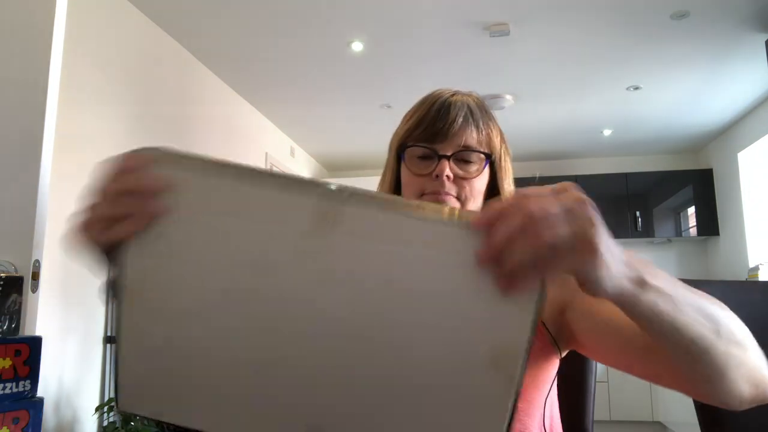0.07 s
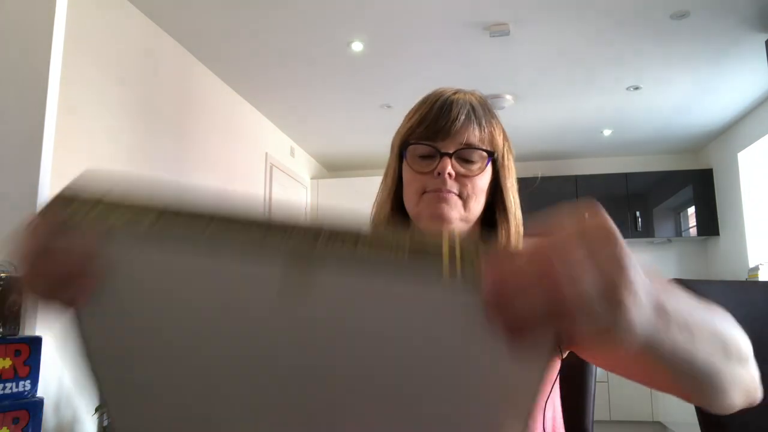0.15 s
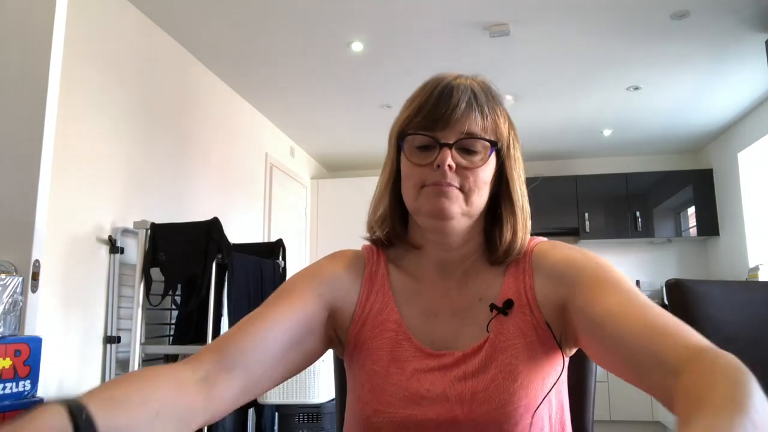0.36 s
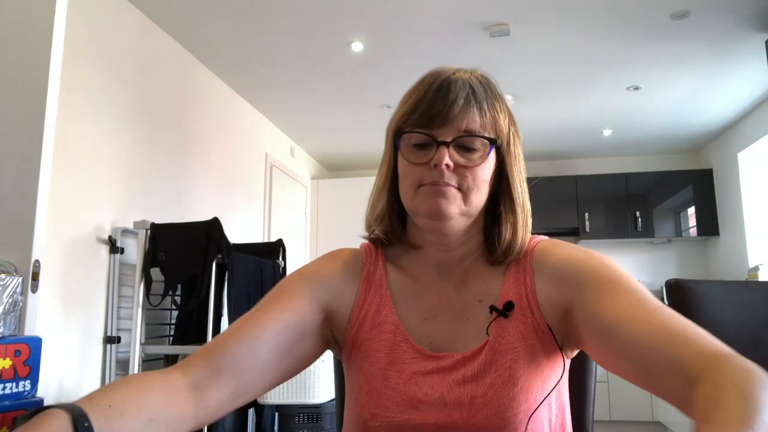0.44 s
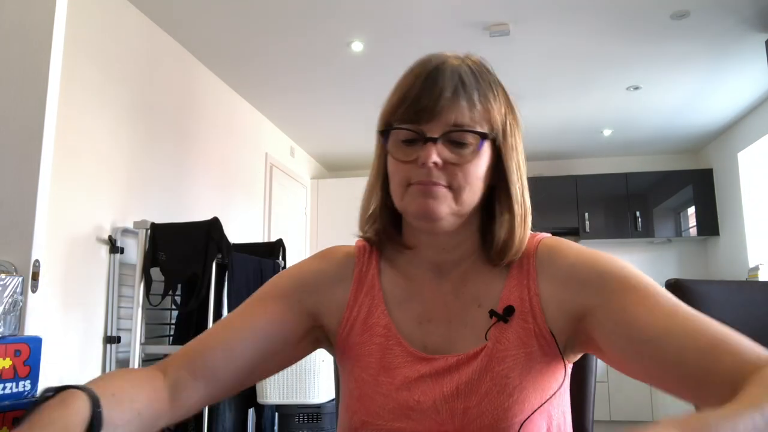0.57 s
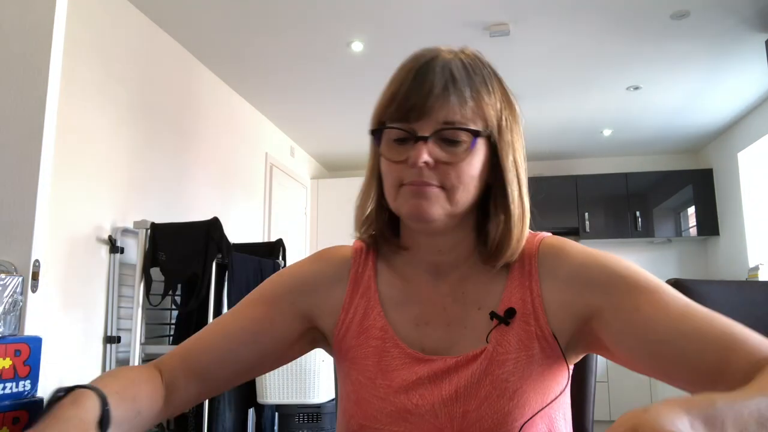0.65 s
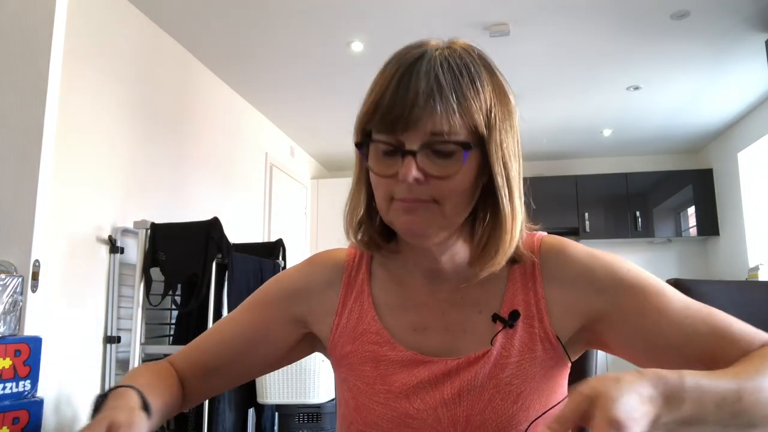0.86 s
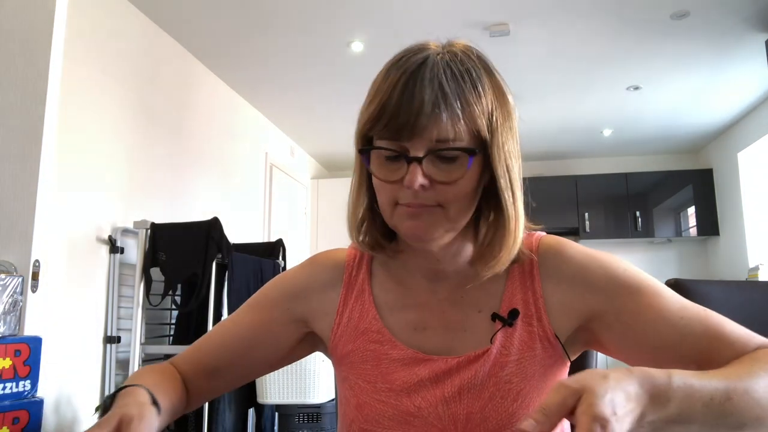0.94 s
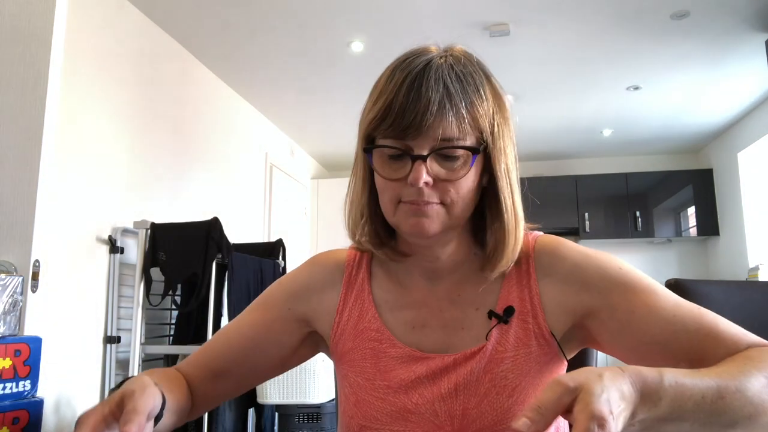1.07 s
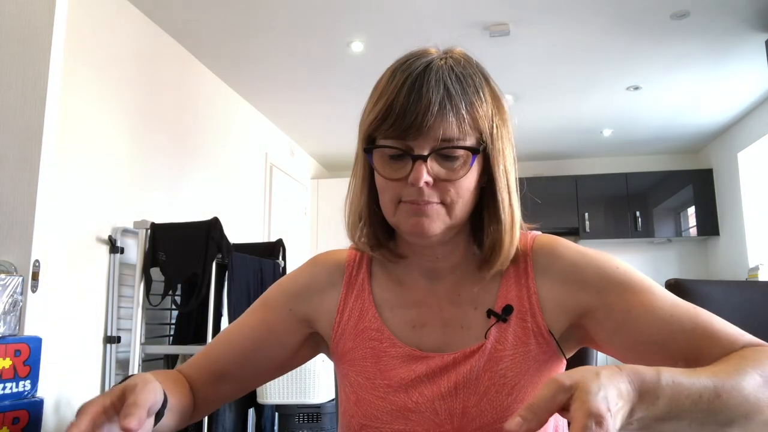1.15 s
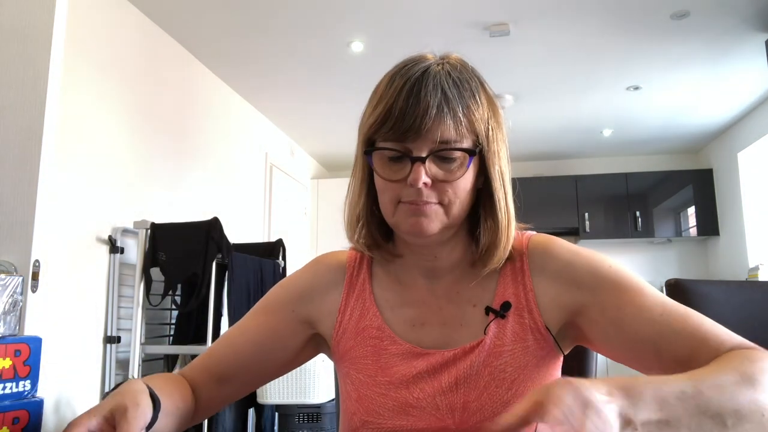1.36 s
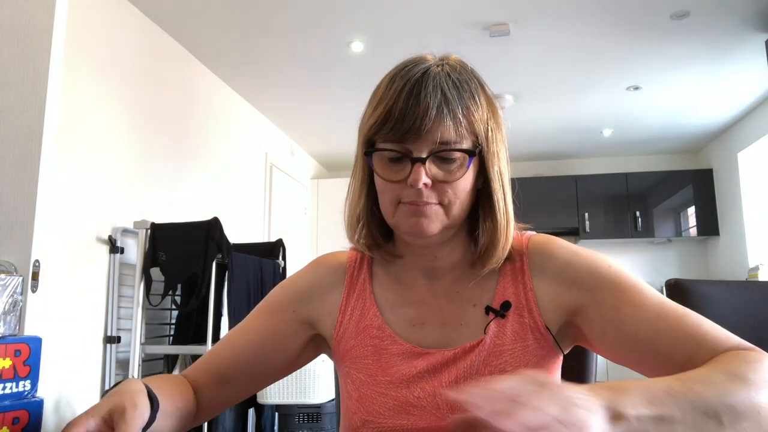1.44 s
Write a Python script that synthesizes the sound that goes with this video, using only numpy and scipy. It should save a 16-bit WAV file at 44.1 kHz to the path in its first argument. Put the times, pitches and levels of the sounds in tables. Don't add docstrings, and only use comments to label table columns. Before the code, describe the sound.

A cardboard box is handled at a table in a bare, reverberant room with faint hum. Fingers rub and the base scuffs and taps until a loud, hollow, cracking slam at 0.22 s overloads the small close microphone. It rocks and scrapes, with softer knocks around 0.36 s and a second clatter at 0.55 s. From 0.9 s come light bumps, paper ticks, rubbing, and a tiny squeak near 1.33 s.

```python
import sys
import numpy as np
from scipy import signal
from scipy.fft import rfft, irfft
from scipy.io import wavfile
from scipy.ndimage import uniform_filter1d, map_coordinates

SR = 44100
rng = np.random.default_rng(int(sys.argv[2]) if len(sys.argv) > 2 else 0)


def generate_wav(sig):
    pcm = np.round(np.clip(np.atleast_2d(sig).T, -1, 1) * 32767).astype(np.int16)
    wavfile.write(sys.argv[1], SR, pcm)


def elevation(decibels):
    levels = np.asarray(decibels, float)
    return 10 ** (levels / 20)


N = 66150


def unit(x):
    return x / np.sqrt(np.mean(x ** 2))


def table(hz, rows):
    rows = np.array(rows, float)
    return np.interp(np.log(np.maximum(hz, 1)), np.log(rows[:, 0]), rows[:, 1])


def shaped(x, gain_db):
    return irfft(rfft(x) * elevation(gain_db(np.fft.rfftfreq(len(x), 1 / SR))), len(x))


def colored(x, centre_hz, octave_db):
    return unit(shaped(x, lambda f: -octave_db * np.log2(np.maximum(f, 50) / centre_hz) ** 2))


def add(out, x, at_s):
    i = max(int(at_s * SR), 0)
    out[i:i + len(x)] += x[:N - i]


def walk(rate):
    k = int(SR / rate)
    once = uniform_filter1d(rng.standard_normal(N), k)
    return unit(uniform_filter1d(once, k))


def slips(grains_per_s):
    happens = rng.random(N) < grains_per_s / SR
    scatter_db = 1.5 * rng.standard_normal(N)
    return happens * rng.standard_normal(N) * elevation(scatter_db)


def press(start, rise, fall):
    corners = [start, start + rise, start + rise + fall]
    return np.sin(np.pi / 2 * np.interp(np.arange(N) / SR, corners, [0, 1, 0])) ** 2


def ring(modes, spread_db):
    swell_ms = 0.91
    t = np.arange(SR // 5)[:, None] / SR
    hz, db, t60 = np.array(modes).T
    decay = np.exp(-np.log(1000) * t / np.maximum(t60, .005))
    swell = 1 - np.exp(-(t + 1 / SR) * 1000 / swell_ms)
    polarity = (-1) ** np.arange(len(hz))
    return (polarity * elevation(db + spread_db) * np.sin(2 * np.pi * hz * t) * decay * swell).sum(axis=1)


# f/Hz, level/dB
CRACK_SPECTRUM = [(600, 14), (1500, 7), (2300, 1), (3200, -5), (5100, -9), (6200, -18.5), (10000, -25.5),
                  (16000, -49.5)]


def blows(rows, modes, damp_s):
    crack_rise_s, crack_s, crack_lag_s = 0.0012, 0.0053, .0008
    out, t = np.zeros(N), np.arange(2048) / SR
    damping = np.exp(-np.arange(SR // 5) / SR / damp_s)
    chance = rng.standard_normal((len(rows), len(modes)))
    for (at_s, db, contact_ms, crack_db), spread in zip(rows, chance):
        push = np.sin(np.pi * np.clip(t * 1000 / contact_ms, 0, 1)) ** 2
        body = ring(modes, 1.5 * spread) * damping
        add(out, -elevation(db) * 0.48 * signal.fftconvolve(push / push.sum(), body), at_s)
        crack = unit(shaped(rng.standard_normal(len(t)), lambda f: table(f, CRACK_SPECTRUM)))
        envelope = np.minimum(t / crack_rise_s, 1) * np.exp(-t / crack_s)
        add(out, elevation(db + crack_db) * crack * envelope, at_s + crack_lag_s)
    return out


# f/Hz, level/dB per Hz
AIR_SPECTRUM = [(20, -5), (60, -8), (300, -18), (500, -15.5), (1000, -26.5), (2000, -31), (5000, -41),
                (16000, -51)]


def hum():
    air_db, duct_db, drift_db = -56, -68, -51
    duct_hz, duct_width_hz, drift_hz = 397, 24, 14
    flutter_db = .8 * walk(8)
    air = unit(shaped(rng.standard_normal(N), lambda f: table(f, AIR_SPECTRUM)))
    duct = unit(shaped(rng.standard_normal(N),
                       lambda f: -10 * np.log10(1 + (2 * (f - duct_hz) / duct_width_hz) ** 4)))
    drift = uniform_filter1d(walk(2 * drift_hz), size=500)
    return air * elevation(air_db + flutter_db) + elevation(duct_db) * duct + elevation(drift_db) * drift


# start t/s, rise t/s, fall t/s, level/dB, centre f/Hz
RUBS = [(-.04, 0.03, 0.71, -65.5, 4710), (0.353, .085, .04, -58, 12600), (0.381, 0.013, 0.188, -56, 3260),
        (0.481, .037, .018, -62, 10740), (.548, 0.013, 0.023, -59.5, 8840), (.83, 0.022, .02, -73.5, 5550),
        (0.904, 0.0098, 0.0063, -75, 1780), (1.067, 0.019, 0.15, -66, 3420),
        (1.069, 0.024, 0.16, -67, 11100), (1.196, .02, .03, -66.5, 8770), (1.213, .01, 0.028, -60, 1000),
        (1.242, 0.017, 0.15, -64, 4700), (1.317, 0.015, 0.022, -61.5, 7350)]


def rubs():
    out = np.zeros(N)
    for start, rise, fall, db, hz in RUBS:
        hiss = colored(slips(grains_per_s=16000), hz, octave_db=4.5)
        out += elevation(db + 1.6 * walk(54)) * press(start, rise, fall) * hiss
    return out


# f/Hz, level/dB, t60/s
FLAT_MODES = [(51, -12, 0.062), (140, -14, 0.11), (243.7, -15.5, 1), (278, -15, 0.18), (347, 1.5, 0.049),
              (425.4, 0, 0.12), (526, -5, 0.037), (693, -4.5, 0.043), (823, -4.5, 0.047), (1106, -8, 0.051),
              (1264, -13.5, 0.13), (1529, -10, 0.028), (2120, -20.5, 0.0406), (2410, -23.5, 0.04)]
# start t/s, rise t/s, fall t/s, level/dB
SCUFFS = [
    (-.04, 0.03, 0.11, -46),
    (0.068, 0.017, 0.079, -55.5),
    (0.128, 0.027, 0.082, -55.5),
    (0.291, 0.065, 0.052, -40.5),
    (0.518, 0.031, 0.13, -37),
    (.6, 0.01, 0.032, -70),
    (0.958, 0.045, 0.03, -59),
    (1.071, 0.014, 0.13, -51.5),
    (1.202, 0.0073, 0.061, -47.5),
    (1.269, 0.029, 0.091, -53),
]


def scuffs():
    grains_per_s, ring_s = 2500, .004
    modes = FLAT_MODES[3:]
    tilt_db = -.1 * np.arange(len(modes))
    body = ring(modes, tilt_db) * np.exp(-np.arange(SR // 5) / SR / ring_s)
    scrape = unit(signal.fftconvolve(slips(grains_per_s), body)[:N])
    grit = colored(slips(grains_per_s), 1510, octave_db=4.5)
    pressure = sum(elevation(db) * press(start, rise, fall) for start, rise, fall, db in SCUFFS)
    return (scrape + elevation(-13.5) * grit) * pressure


# f/Hz, t60/s
ROOM_T60 = [(60, 0.078), (250, 0.4), (500, 0.39), (1000, 0.56), (2000, 0.57), (4000, 0.47), (8000, 0.31),
            (16000, 1)]


def room(x):
    room_db, rise_s = -7.5, 0.0035
    sway_ms, sway_per_s = .25, 40
    t, tail = np.arange(SR) / SR, 0
    for hz in 45 * 2 ** np.arange(0, 8.6, .5):
        band = shaped(rng.standard_normal(SR), lambda f: -40 * np.log2(np.maximum(f, 1) / hz) ** 2)
        tail = tail + band * np.exp(-np.log(1000) * t / table(hz, ROOM_T60))
    tail = tail * (1 - np.exp(-t / rise_s))
    wet = signal.fftconvolve(x, tail / np.sqrt(np.sum(tail ** 2)))[:N]
    path = np.arange(N) + sway_ms * SR / 1000 * walk(sway_per_s)
    return elevation(room_db) * map_coordinates(wet, [path], mode="nearest")


# f/Hz, level/dB, t60/s
HELD_MODES = [(175, -8, 0.057), (284, -4, 0.17), (385, -3.5, 0.07), (522.6, 1.5, 0.025), (625, -3.5, 0.079),
              (814, -6.5, 0.043), (980, -4.5, 0.023), (1488, -9, 0.036), (1820, -19.5, .04)]
# t/s, level/dB, contact/ms, crack level/dB
TAPS = [(.005, -62, 0.56, -42), (.014, -34.5, 0.91, -48), (.028, -72, 1.5, -40), (.081, -52, 0.34, -45),
        (.092, -38, 0.43, -52), (.168, -41.5, 0.65, -55), (.907, -29, 3.6, -14), (.914, -35, 1, -8.5),
        (.9225, -29.5, 0.4, -46), (.977, -40, 0.52, -49.5), (1.090, -70, 0.7, -36), (1.177, -40, 0.41, -40),
        (1.208, -17, 5.4, -33), (1.215, -39, 1.9, -32.5), (1.223, -28.5, 0.45, -45),
        (1.229, -34, 0.96, -36), (1.237, -57, 4.9, -34.5), (1.296, -48, 0.5, -38),
        (1.318, -37, 0.93, -33.5)]


def taps():
    return blows(TAPS, HELD_MODES, damp_s=0.0097)


# f/Hz, level/dB, t60/s
RAISED_MODES = [(137, -10.5, 0.1), (250, -23, 0.6), (343, -19, 0.087), (425.6, 4.5, 0.041),
                (571.7, -4, 0.26), (656.5, -1, 0.088), (792, -9.5, 0.13), (952, -16, 0.18),
                (1105, -7, 0.065), (1206, -23, 0.12), (1440, -26.5, 0.055), (1590, -15.5, 0.088),
                (1910, -22, 0.16), (2350, -18, 0.031)]
# t/s, level/dB, contact/ms, crack level/dB
SLAMS = [
    (.2176, 6.5, .9, -14.5),
    (.2218, -1, .8, -8.5),
    (.2255, -13, .8, -3),
    (.2325, -15.5, 1.04, -4),
    (.240, -14, 1.5, -2),
    (.250, -17, 1.0, -46.5),
    (.266, -20, 1.2, -44),
    (.331, -26.5, .9, -45),
    (.376, -35.5, 0.5, -43),
]


def slams():
    return -blows(SLAMS, RAISED_MODES, damp_s=0.038)


# t/s, level/dB, f/Hz, length/s
THUDS = [(0.28, -33, 38.6, 0.0095), (.362, -68, 220, 0.02), (0.28, -41, 55, 0.018),
         (.445, -31.5, 130, 0.0087), (0.76, -54, 108, .02), (0.487, -49, 55, 0.026),
         (0.59, -24.5, 84, 0.004), (0.54, -39, 36, 0.026), (0.48, -52, 65, 0.0065),
         (0.923, -46, 64, 0.0085), (1.29, -47.5, 160, 0.0075), (1.24, -43, 44, 0.025)]


def thuds():
    out, t = np.zeros(N), np.arange(N) / SR
    for at_s, db, hz, length in THUDS:
        since = t - at_s
        out += elevation(db) * np.sin(2 * np.pi * hz * since) * np.exp(-(since / length) ** 2)
    return out


# t/s, level/dB, contact/ms, crack level/dB
KNOCKS = [(.354, -22, 0.84, -42), (.3625, -19.5, 0.48, -5), (.410, -26.5, 1.75, -40), (.540, -18, 1.2, -48),
          (.547, -24, 0.95, -37), (.552, -37, 0.88, -24), (.5560, -18.5, 0.39, -1),
          (.5578, -6.5, 1.02, -19), (.5608, -8, 1.32, -12), (.567, -14.5, 0.59, -6), (.575, -28, 0.64, -11),
          (.589, -15, 0.89, -24), (.607, -31.5, 1.1, -32)]


def knocks():
    return blows(KNOCKS, FLAT_MODES, damp_s=0.036)


# t/s, level/dB, f/Hz
TICKS = [
    (0.7981, -59.5, 4940),
    (0.841, -54, 4340),
    (.9068, -46, 5750),
    (0.909, -51, 5900),
    (0.912, -51.5, 5500),
    (.9245, -68, 8000),
    (1.100, -62, 3500),
    (1.297, -49, 9040),
    (1.336, -48.5, 4370),
]


def ticks():
    out, t = np.zeros(N), np.arange(512) / SR
    for at_s, db, hz in TICKS:
        snap = colored(rng.standard_normal(len(t)), hz, octave_db=7)
        add(out, elevation(db) * snap * np.minimum(t / 0.0004, 1) * np.exp(-t / .0012), at_s)
    return out


def squeak():
    at_s, hz, db, length_s = 1.331, 10300, -63, .007
    t = np.arange(N) / SR - at_s
    return elevation(db) * np.sin(2 * np.pi * hz * t + 1.4 * walk(1200)) * np.exp(-(t / length_s) ** 2)


def scene():
    near = rubs() + scuffs() + taps() + slams() + thuds() + knocks() + ticks()
    return (hum() + near + room(near) + squeak())[None, :]


def low_pass(x):
    return signal.sosfilt(signal.butter(12, 16240, fs=SR, output="sos"), x)


def record(dry):
    ceiling, knee, top_hz = 1.0, 9, 15900
    clipped = dry[0] / (1 + np.abs(dry[0] / ceiling) ** knee) ** (1 / knee)
    mix = shaped(clipped, lambda f: -60. * (f > top_hz))[None, :]
    return low_pass(mix)


dry = scene()
out = record(dry)
generate_wav(out)
```